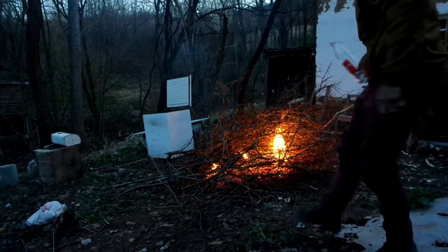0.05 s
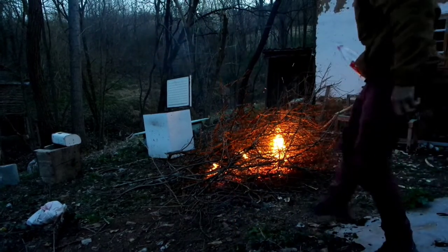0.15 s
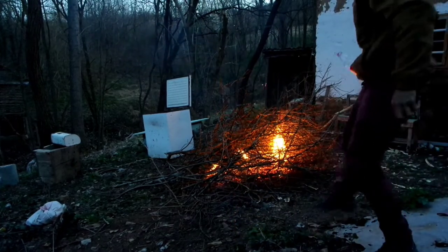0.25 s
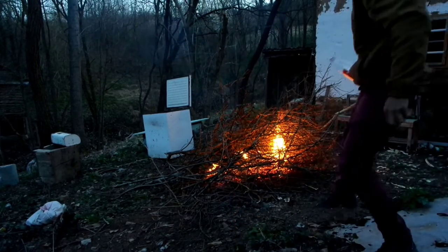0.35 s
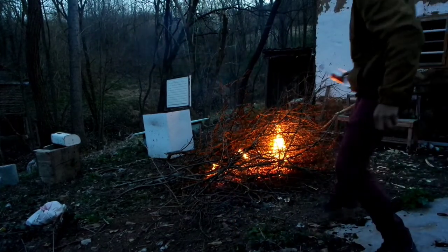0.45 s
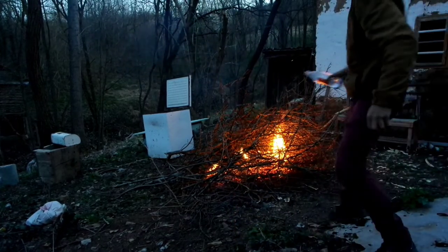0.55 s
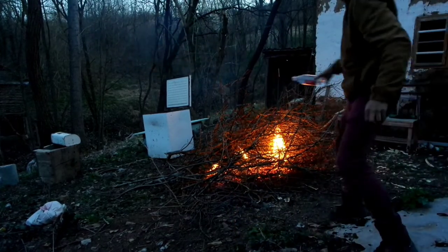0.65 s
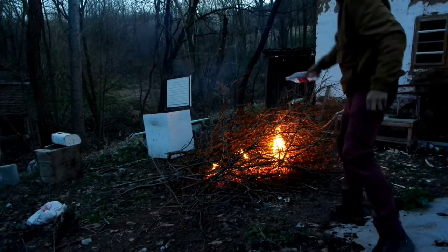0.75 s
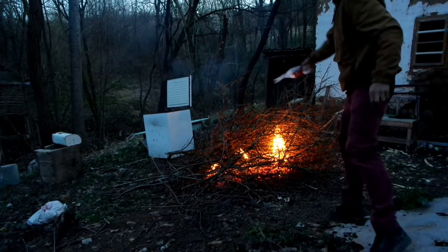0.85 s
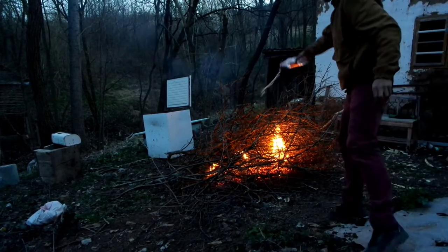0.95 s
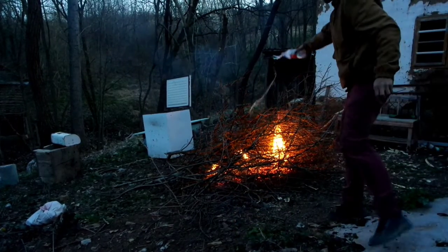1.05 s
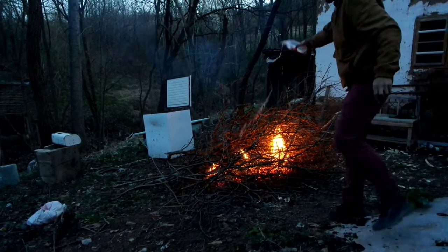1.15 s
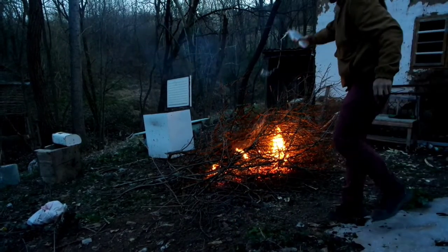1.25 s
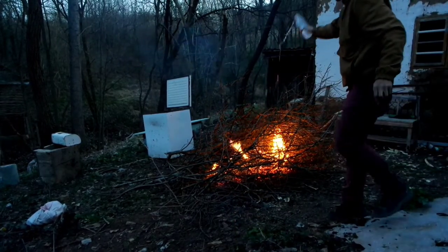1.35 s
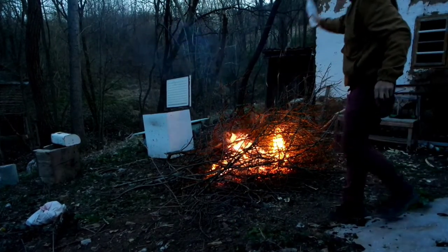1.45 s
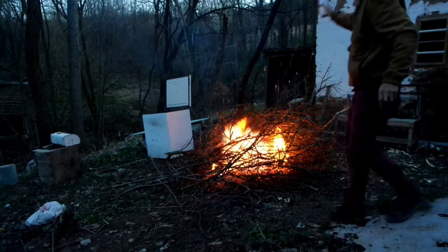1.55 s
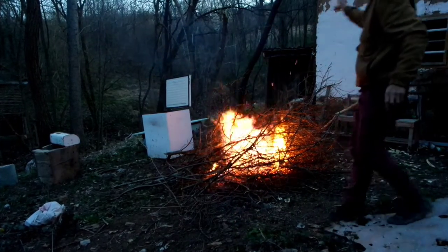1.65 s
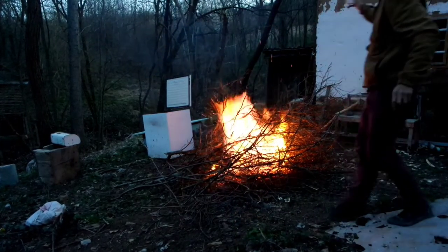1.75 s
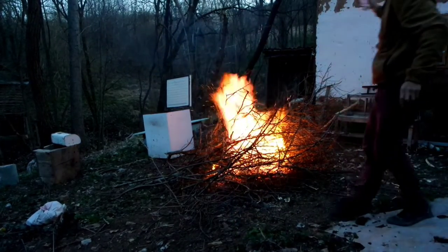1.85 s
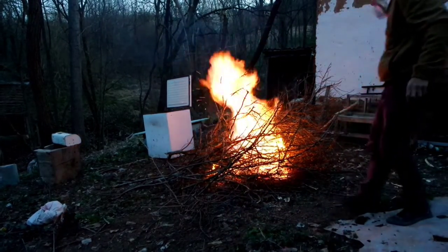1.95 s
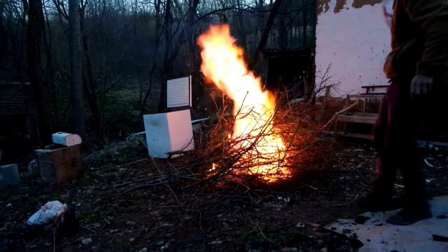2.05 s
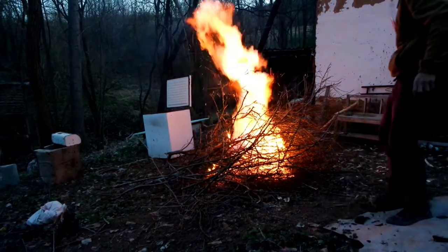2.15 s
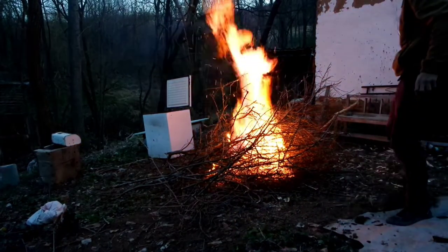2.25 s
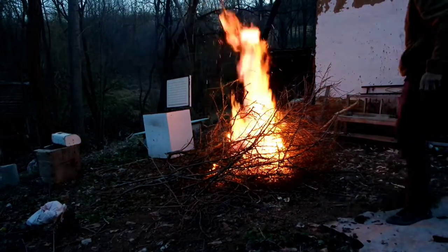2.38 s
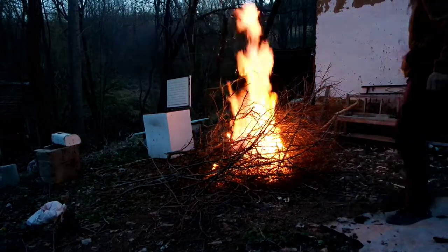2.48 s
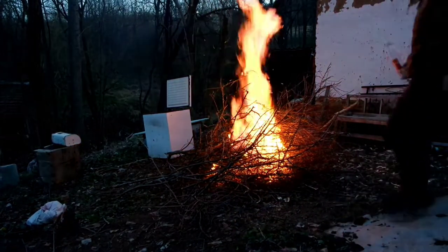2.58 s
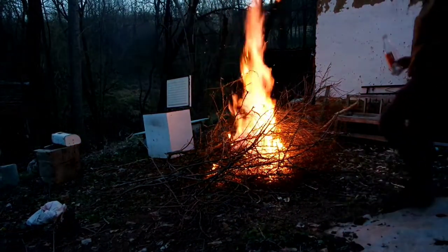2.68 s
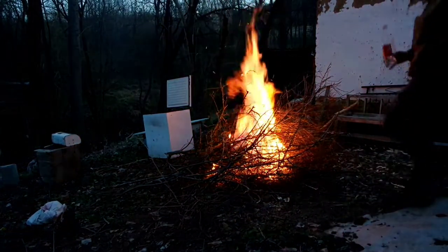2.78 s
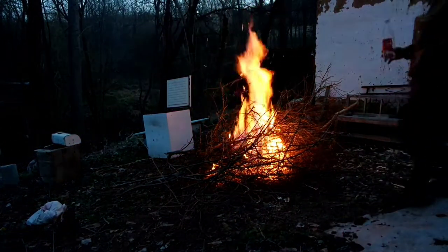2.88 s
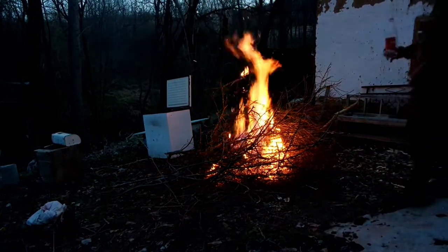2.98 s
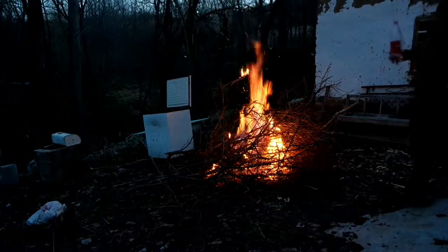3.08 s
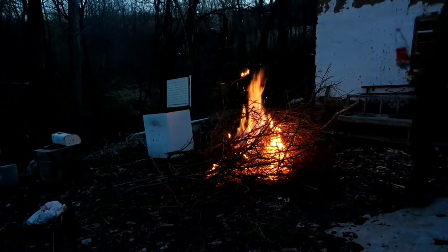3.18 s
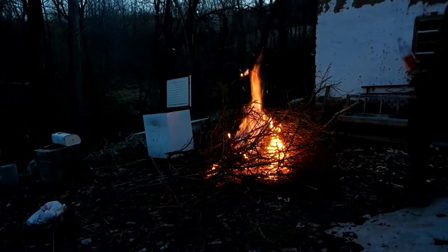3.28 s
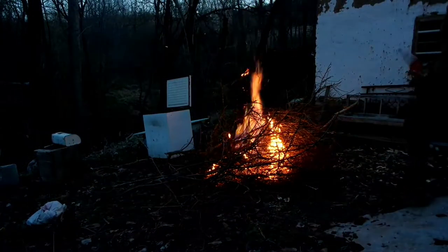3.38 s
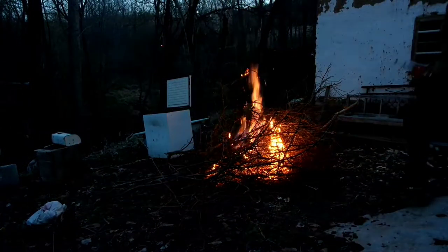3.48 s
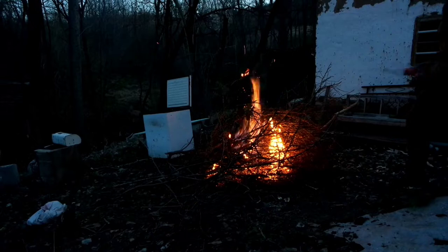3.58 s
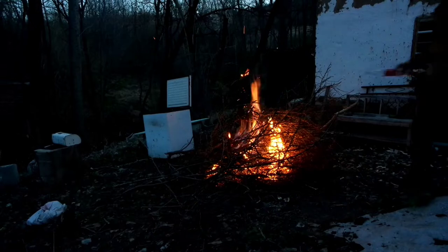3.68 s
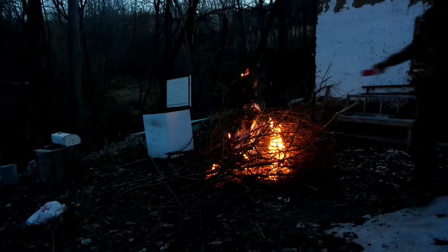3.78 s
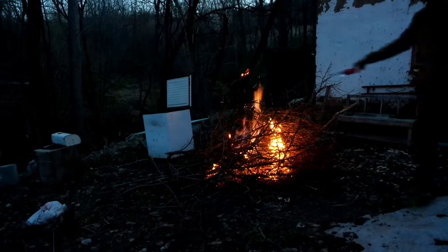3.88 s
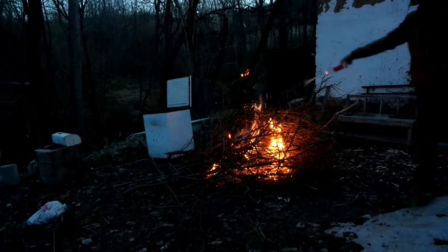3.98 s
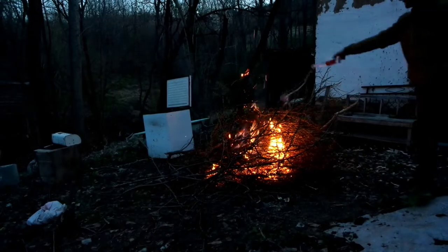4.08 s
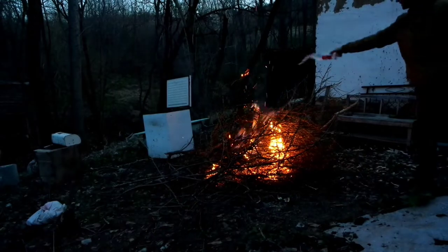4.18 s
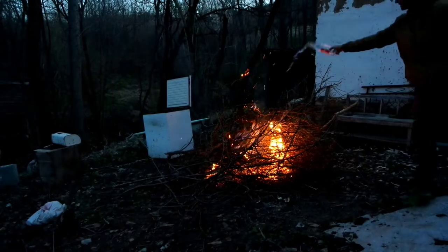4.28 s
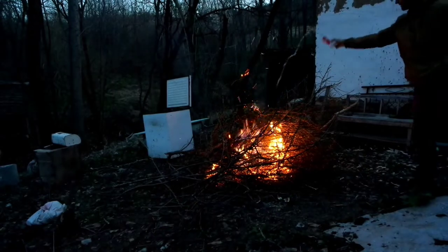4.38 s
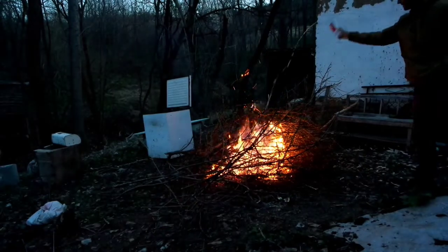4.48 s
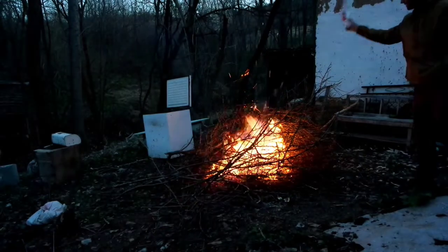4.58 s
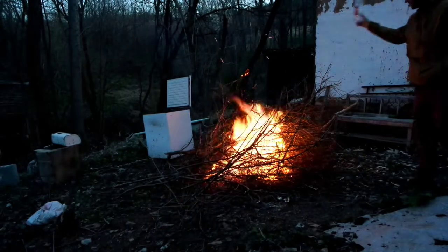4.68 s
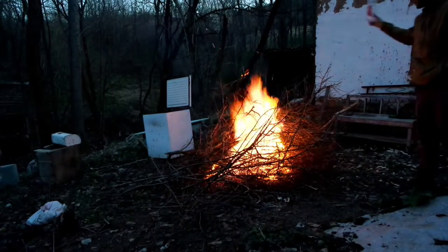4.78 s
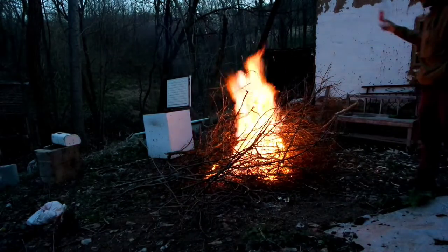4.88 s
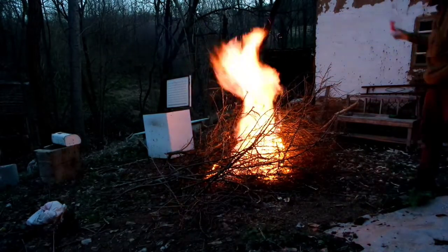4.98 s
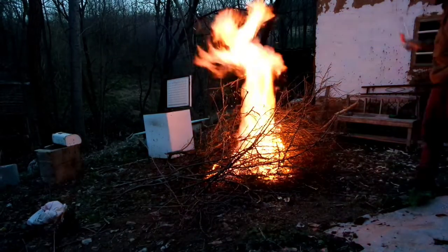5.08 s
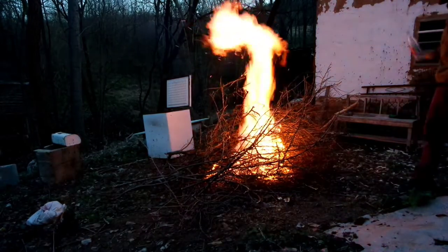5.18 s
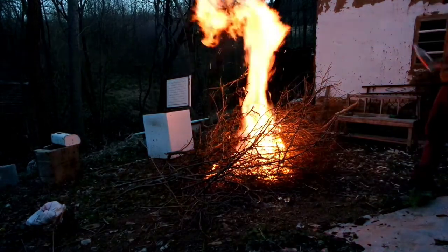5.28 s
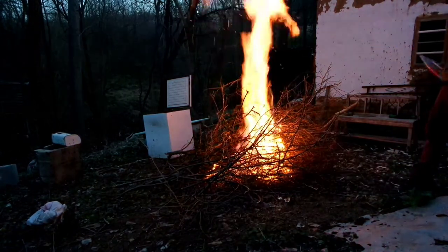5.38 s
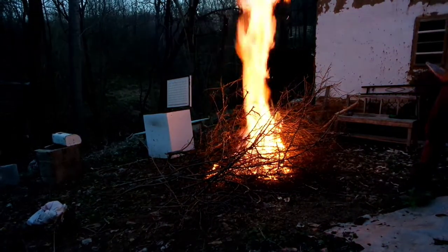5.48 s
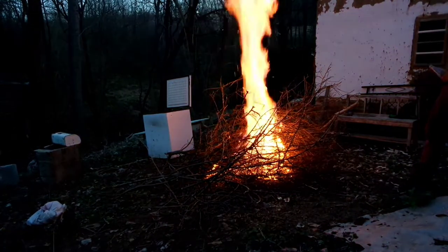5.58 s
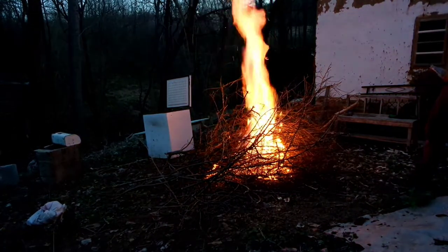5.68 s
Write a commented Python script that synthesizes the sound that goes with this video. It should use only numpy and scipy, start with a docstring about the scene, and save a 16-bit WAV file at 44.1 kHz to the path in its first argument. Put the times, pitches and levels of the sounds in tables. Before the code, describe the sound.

A brush pile burns in a garden at dusk. Nearly silent smouldering and bird trills give way to a spatter of fuel and a sudden deep, throbbing blaze with hissing steam and hard crackles. The fire dies back to small pops and a sharp spit, then rushes up again to the end. The microphone stands outdoors at moderate distance, fairly dry, with birds blurred by trees.

```python
"""A garden at dusk: a pile of wet brush smoulders, flares up, dies back and flares up again.
Flames are throbbing, fluttering noise; twigs sizzle as noise and pitched ticks, and sap bubbles ring.
Twigs snap in filtered pulses, gas pops in short swelling tones, and spits are jets of gritty noise.
Gliding tones make the birds and a thin steam whistle. Squirted fuel patters as small ringing drops,
and whoomps are low gusts of noise. The yard gives the crackle a short tail, the wood blurs the birds."""
import sys
import numpy as np
from scipy import signal
from scipy.fft import rfft, irfft
from scipy.io import wavfile
from scipy.ndimage import uniform_filter1d

SR = 44100
rng = np.random.default_rng(int(sys.argv[2]) if len(sys.argv) > 2 else 0)


def dump(signal):
    """Clip the signal to [-1, 1] and save it as 16-bit WAV at the path in sys.argv[1]."""
    limited = np.clip(np.atleast_2d(signal).T, -1, 1)
    pcm = np.round(limited * 32767).astype(np.int16)
    wavfile.write(sys.argv[1], SR, pcm)


N = 253134
TIME = np.arange(N) / SR  # seconds
HZ = np.fft.rfftfreq(N, 1 / SR)

# Tone curves of the still air, flame rumble, flame rush and sizzle.
# Each row: frequency in Hz, density in dB per Hz, relative within its curve.
AIR_CURVE = [(20, -20), (90, -11), (170, 5), (300, -5), (600, -16), (1500, -19.5), (6000, -20),
             (10500, -21.5), (15000, -21)]
RUMBLE_CURVE = [(8, -15), (22, -6), (40, -10.5), (85, -4), (115, -8), (175, -9), (210, -7), (320, -14),
                (450, -20), (800, -62), (2000, -94)]
RUSH_CURVE = [(80, -45), (250, -3.5), (520, 3), (800, -4), (1300, -8.5), (2300, -6.5), (3500, -12),
              (7000, -11.5), (16000, -75)]
SIZZLE_CURVE = [(300, -35), (1200, -24), (2400, -5.5), (4000, -2), (5500, -8.5), (8500, 2.5), (11500, 0.5),
                (13500, -2.5), (15000, -2.5)]
# Pitches at which the flame throbs. Each row: centre in Hz, width in Hz, boost over the rumble in dB.
FLAME_THROBS = [(60.8, 7.5, 7.5), (131.4, 12, 10.5), (151.6, 8.6, 12)]
# How hard the pile burns: embers, a flare that dies back, then a second.
# Each row: time in seconds, burn strength in dB, which drives the flame rumble.
BURN_CURVE = [(0, -52), (.16, -72), (.7, -72), (1.1, -63.5), (1.39, -66.5), (1.45, -56.5), (1.61, -56),
              (1.73, -38.5), (2.3, -38), (2.76, -39), (2.87, -43), (3.27, -39.5), (3.52, -45),
              (3.63, -51.5), (4.15, -53), (4.54, -54.5), (4.66, -40), (5.74, -38.5)]
# Spits of steam, gas and spattering liquid.
# Each row: start in seconds, level in dB, centre in Hz, rise in seconds, 60 dB fade in seconds.
SPIT_JETS = [(.003, -48.5, 7000, 0.0018, 0.32), (1.05, -51.5, 3540, 0.018, 0.28),
             (1.07, -62.5, 450, .03, .9), (1.2, -48.5, 3000, 0.0018, 0.084), (1.22, -57, 2980, .03, 0.39),
             (1.413, -41.5, 8200, 0.0047, 0.16), (1.43, -61, 1700, .02, 1.1),
             (1.452, -44.5, 7500, .002, 0.4), (1.5, -48, 7400, .14, 1.1), (1.74, -47, 3000, 0.15, 1.4),
             (2.47, -33, 9000, 0.037, 0.11), (2.674, -29.5, 6700, 0.011, 0.18),
             (2.944, -35, 5960, 0.0029, 0.14), (3.227, -40, 8000, .004, 0.52),
             (3.47, -39.5, 8500, .03, 0.33), (3.838, -45.5, 8100, 0.015, 0.14),
             (3.941, -30.5, 4750, 0.00079, 0.19), (3.945, -48.5, 590, 0.016, 0.43),
             (4.198, -38.5, 6600, 0.0012, 0.22), (4.28, -59, 5970, .03, 0.72), (4.63, -40, 7450, .02, .35),
             (4.98, -42.5, 2200, 0.059, 1.06), (5.43, -38, 9000, 0.0089, 0.26)]
# Placed twig snaps. Each row: start in seconds, strike energy in dB, centre in Hz,
# share of splintering from 0 to 1, number of cracks.
TWIG_SNAPS = [(0.0385, -22.5, 10900, 0.4, 1), (0.4374, -31.5, 9200, 0.5, 1), (0.889, -27.5, 4850, 0.46, 1),
              (1.0449, -27, 9020, 0.7, 1), (1.154, -24, 9100, 0, 1), (1.417, -13.5, 7760, 0.83, 1),
              (1.4539, -14.5, 7340, 0.2, 1), (1.82, -16.5, 6760, 0.8, 1), (1.9349, -16, 4400, 0.47, 1),
              (1.9746, -11, 3530, 0.77, 1), (2.0598, 0.5, 9600, 0.34, 1), (2.133, -12, 4080, 0.8, 1),
              (2.2866, -9, 7550, 0.7, 1), (2.5293, -9.5, 7400, 0.05, 1), (2.5717, -12.5, 4070, 0.4, 1),
              (2.946, -13, 5560, 0.5, 2), (3.0814, -1, 8800, 0.76, 1), (3.139, -14, 9200, 0.36, 1),
              (3.23, -12.5, 6380, 0.3, 1), (3.3122, -2.5, 10100, 0.46, 1), (3.6641, -20.5, 9000, 0.2, 1),
              (3.714, -19.5, 7000, 0.6, 1), (3.82, -23, 10220, 0.7, 1), (3.8415, -16.5, 8400, 0.25, 2),
              (3.921, -20, 9090, 0, 1), (3.9422, -9.5, 4900, 0.6, 1), (3.9528, -9.5, 7300, 0.3, 2),
              (4.0479, -24.5, 9000, 0.4, 1), (4.321, -28, 10000, 0.4, 1), (4.5544, -19, 9100, 0.8, 1),
              (4.635, -7.5, 8450, 0.18, 1), (4.8827, -1, 9200, 0.23, 1), (5.3104, -12, 9080, 0.4, 2),
              (5.3975, -12, 8500, 0.4, 1), (5.4688, -18, 8310, 0.2, 1), (5.5906, 2.5, 9800, 0.52, 2),
              (5.6947, -5.5, 9100, 0.4, 1)]
# Placed dull pops of gas and sap. Each row: time in seconds, strike energy in dB, centre in Hz.
GAS_POPS = [(0.5773, -38, 3240), (0.7773, -35.5, 617), (1.0884, -22.5, 3160), (1.099, -29, 1290),
            (1.204, -30.5, 1090), (1.4552, -21.5, 2640), (1.8656, -9, 2310), (1.9358, -14, 2310),
            (2.0203, -10, 800), (2.0209, 0.5, 202), (2.4987, -12, 2230), (2.5727, -14.5, 815),
            (2.7513, -11.5, 1910), (2.946, -13.5, 2450), (3.209, -18, 745), (3.266, -15, 800),
            (3.942, -16, 2060), (4.1754, -27, 2550), (4.1998, -22.5, 1280), (4.4517, -28, 3660),
            (4.9791, -13, 4820)]
# Chance crackles. Each set: rate per second, strike energy at full blaze in dB, spread in dB,
# lowest centre in Hz, highest centre in Hz.
CHANCE_SNAPS = (16, -20.5, 1, 5000, 10500)
CHANCE_POPS = (14, -24.5, 0.4, 604, 3000)
# Bird trills, one syllable repeated. Each row: start in seconds, repeats, period in seconds,
# swell in dB per repeat, syllable length in seconds, start, middle and end pitch in Hz,
# first syllable's level in dB ahead of the wood mix.
BIRD_TRILLS = [(0.122, 4, .16, 1.55, .08, 6430, 5710, 3630, -65.5),
               (1.438, 3, .2155, 1.8, 0.052, 4950, 5120, 5640, -48),
               (1.549, 2, 0.2, 5, 0.063, 4950, 4300, 3950, -56),
               (2.806, 4, 0.11, 0.7, 0.063, 3480, 3950, 4680, -49.5),
               (4.52, 4, .183, 1.9, 0.062, 4750, 5420, 5720, -54),
               (4.577, 4, 0.16, 1, 0.11, 6670, 6640, 6620, -52)]
# Single bird calls. Each row: start in seconds, length in seconds, start, middle and end pitch in Hz,
# level in dB ahead of the wood mix.
BIRD_CALLS = [(0.86, 0.14, 7980, 7370, 7000, -64), (1.084, 0.063, 5050, 4700, 3620, -54.5),
              (1.228, 0.066, 6350, 5950, 4270, -57), (1.333, 0.038, 4190, 4130, 4200, -59.5),
              (2.32, 0.11, 6750, 5820, 5820, -43.5), (2.507, 0.035, 4180, 3850, 3480, -47),
              (3.292, 0.098, 7450, 7280, 6960, -45), (3.45, 0.069, 5780, 5140, 3910, -47),
              (3.953, 0.16, 2380, 2300, 2134, -60), (4.27, .04, 4950, 4100, 3330, -54),
              (4.39, 0.093, 5970, 5970, 5890, -53.5), (4.987, 0.092, 2970, 2880, 2810, -47),
              (5.16, 0.09, 2155, 1995, 1870, -52), (5.256, 0.064, 4400, 4300, 4130, -47.5),
              (5.457, 0.13, 3000, 2680, 2096, -45), (5.574, .17, 2130, 2400, 2570, -45)]
# Steam singing thinly out of a wet branch. The row: start in seconds, length in seconds,
# start, middle and end pitch in Hz, level in dB.
STEAM_NOTE = (1, 0.5, 10677, 10304, 10446.5, -78)
# Squirted fuel pattering on the brush. The row: start in seconds, level in dB, rise in seconds,
# hold in seconds (below zero: the fade starts inside the rise), 60 dB fade in seconds.
FUEL_PATTER = (1.4, -60, 0.5, -0.16, 0.8)
# Splashes of fuel catching at once. Each row: start in seconds, level in dB, centre in Hz.
FUEL_WHOOMPS = [(1.69, -37, 68), (3.945, -43, 133), (4.195, -51, 160), (4.865, -36.5, 137)]

AIR_DB = -68.5
BLAZE_DB = -38  # burn strength at full blaze
# rush and sizzle follow the burn: drive at full blaze, and dB of change per dB of burn
RUSH_DB, RUSH_SLOPE = -47.3, 0.99
SIZZLE_DB, SIZZLE_SLOPE = -49.5, 1.0
EMBER_SIZZLE_DB = -78  # the sizzle drive never sinks below this
WARM_UP_S = 0.076  # time constant
RECRACK_S, RECRACK_DB = 0.0069, -3.5  # a tough twig gives way again, a little later and weaker
CRACKLE_SLOPE = 0.98  # dB of chance crackle energy per dB of burn
WHOOMP_RISE_S, WHOOMP_T60_S = 0.024, 0.43
CUTOFF_HZ = 15050


def amp(db):
    """Decibels to gain."""
    return 10 ** (np.asarray(db) / 20)


def unit(x):
    """Scales to an rms of 1."""
    return x / np.sqrt(np.mean(x ** 2) + 1e-20)


def unit_energy(x):
    """Scales to an energy of 1."""
    return x / (np.linalg.norm(x) + 1e-12)


def noise(length=N):
    """Raw white noise."""
    return rng.standard_normal(length)


def shape(points):
    """Gain at every frequency, from (Hz, dB) points on a log axis."""
    hz, db = np.transpose(points)
    return amp(np.interp(np.log(HZ + 1), np.log(hz + 1), db))


def colour(x, gain):
    """Filters x by a gain per frequency; rms 1."""
    return unit(irfft(rfft(x) * gain, N))


def wander(rate_hz):
    """Random drift of rms 1 that moves up to about rate_hz."""
    return colour(noise(), 1 / (1 + (HZ / rate_hz) ** 4))


def band(x, hz, spread):
    """Causal broad resonance from hz / spread to hz * spread, kept below the top of the range."""
    spread = max(spread, 1.05)
    top = min(hz * spread, 0.45 * SR)
    bottom = min(hz / spread, 0.75 * top)
    return signal.lfilter(*signal.butter(2, [bottom, top], "bandpass", fs=SR), x)


def add(mix, s, sound):
    """Mixes a sound in at s seconds."""
    part = mix[max(round(s * SR), 0):][:len(sound)]
    part += sound[:len(part)]


def swell(s, rise, hold, t60):
    """Gain that rises from s; its fade starts hold seconds after the rise."""
    t = TIME - s
    return np.clip(t / rise, 0, 1) * amp(-60 * np.maximum(t - rise - hold, 0) / t60)


def echoes(x, t60, delay):
    """Diffuse reflections that build up over delay seconds and die away."""
    t = TIME[:SR // 2]
    tail = noise(len(t)) * amp(-60 * t / t60) * (1 - np.exp(-t / delay))
    return signal.fftconvolve(x, unit_energy(tail))[:N]


def grains(per_s, spread_db, cap):
    """Sparse clicks of random sign, mostly small with a few large ones."""
    size = amp(spread_db * np.minimum(rng.exponential(1, N), cap))
    return size * rng.choice([-1, 1], N) * (rng.random(N) < per_s / SR)


def bubbles(per_s, spread_db):
    """Tiny drops and bubbles, each ringing for a few cycles at one of 22 pitches; rms 1."""
    out, t = np.zeros(N), TIME[:1200]
    for hz in np.geomspace(450, 4500, num=22):
        ring = np.sin(2 * np.pi * hz * t) * t * np.exp(-t * hz / 2.5)
        out += signal.oaconvolve(grains(per_s, spread_db, cap=3.1), unit_energy(ring))[:N]
    return unit(out)


def whistles(notes):
    """Near-pure tones that glide through three pitches and waver a little."""
    out, waver = np.zeros(N), wander(rate_hz=320)
    for s, length, start_hz, middle_hz, end_hz, db in notes:
        u = np.linspace(0, 1, int(length * SR))
        hz = np.polyval(np.polyfit([0, 0.5, 1], [start_hz, middle_hz, end_hz], 2), u)
        hz *= 1 + 0.0097 * np.roll(waver, -round(s * SR))[:len(u)]
        tone = np.sqrt(2) * np.sin(2 * np.pi * np.cumsum(hz) / SR)
        add(out, s, amp(db) * tone * signal.windows.tukey(len(u), 0.42))
    return out


def by_chance(burn_db, per_s, db, spread_db, low_hz, high_hz):
    """Rows (s, energy dB, centre Hz) of small crackles, stronger while the fire burns harder."""
    slot = np.arange(200)  # one crackle per slot, enough slots to outlast the scene
    when, size, pitch = rng.random((len(slot), 3)).T
    s = (slot + when) / per_s
    burn_change = CRACKLE_SLOPE * (np.interp(s, TIME, burn_db) - BLAZE_DB)
    level = db + burn_change + spread_db * (np.minimum(-np.log(size), 3) - 1)
    return np.transpose([s, level, low_hz * (high_hz / low_hz) ** pitch])


def warmed(burn_db):
    """Heat in the twigs: it lags behind a rising fire and sinks with a falling one."""
    keep, cold_db = np.exp(-1 / (WARM_UP_S * SR)), burn_db.min()
    lagging = cold_db + signal.lfilter([1 - keep], [1, -keep], burn_db - cold_db)
    return np.minimum(burn_db, lagging)


def evening_air():
    """Still air: a steady bed of quiet coloured noise."""
    return amp(AIR_DB) * colour(noise(), shape(AIR_CURVE))


def flames(burn_db, rush_db):
    """Turbulent burning: a throbbing rumble, and above it a fluttering rush full of tiny puffs."""
    throb = 1
    for hz, width, db in FLAME_THROBS:
        throb = throb + (amp(db) - 1) * np.exp(-2 * ((HZ - hz) / width) ** 2)
    rumble = colour(noise(), shape(RUMBLE_CURVE) * throb)
    # even out the slow level, so the burn sets the strength and single tongues of flame the flutter
    rumble /= np.sqrt(uniform_filter1d(rumble ** 2, size=8000) + 1e-6)
    flutter = wander(rate_hz=13)
    puffs = unit(grains(per_s=800, spread_db=2.5, cap=7.6))
    rush = colour(noise() + 0.69 * puffs, shape(RUSH_CURVE))
    return rumble * amp(burn_db + 0.66 + 1.3 * flutter) + rush * amp(rush_db + 1.5 * flutter)


def sizzle(burn_db):
    """Water boils out of hot twigs: a surging hiss, and fine ticks in eight pitch bands."""
    drive_db = SIZZLE_DB + SIZZLE_SLOPE * (warmed(burn_db) - BLAZE_DB)
    drive_db = np.maximum(drive_db, EMBER_SIZZLE_DB)
    hiss = ticks = 0
    surge = wander(rate_hz=27)
    for hz in np.geomspace(1800, 12500, num=8):
        # each jet of steam sputters by itself
        sputter = amp(1.3 * wander(rate_hz=100))
        hiss += unit(band(noise(), hz, spread=1.13)) * np.sqrt(hz) * sputter
        clicks = grains(per_s=120, spread_db=6.0, cap=3.25)
        ticks += unit(band(clicks, hz, spread=1.4)) * np.sqrt(hz)
    curve = shape(SIZZLE_CURVE)
    mix = amp(2.33) * colour(hiss, curve) + colour(ticks, curve)
    return mix * amp(drive_db + 2.0 * surge)


def boiling_sap(rush_db):
    """Sap bubbles ring, boiling harder as the flames grow."""
    return bubbles(per_s=14, spread_db=3.5) * amp(rush_db - 6.7)


def spits():
    """A quick jet of gritty noise that dies away, cut off at half a second."""
    out, t = np.zeros(N), TIME[:SR // 2]
    grit = noise() + 0.62 * unit(grains(per_s=1300, spread_db=4.0, cap=6.4))
    for s, db, hz, rise, t60 in SPIT_JETS:
        jet = unit(band(np.roll(grit, -round(s * SR))[:len(t)], hz, spread=3.0))
        fade_db = -60 * np.maximum(t - rise, 0) / t60
        add(out, s, jet * np.minimum(t / rise, 1) * amp(db + fade_db))
    return out


def snaps(burn_db):
    """A twig breaks in one sharp pulse; its fibres splinter for a few milliseconds more."""
    out, t = np.zeros(N), TIME[:900]
    pulse = signal.unit_impulse(len(t))
    strikes = [(*row, 0.4) for row in by_chance(burn_db, *CHANCE_SNAPS)]
    for s, db, hz, share, cracks in TWIG_SNAPS:
        for k in range(round(cracks)):
            strikes.append((s + k * RECRACK_S, db + k * RECRACK_DB, hz, share))
    for s, db, hz, share in strikes:
        share = np.clip(share, 0, 1)
        crack = unit_energy(band(pulse, hz, spread=1.31))
        crack += 0.56 * unit_energy(band(pulse, hz * 0.5, spread=1.92))  # the woody body
        splinter = unit_energy(band(noise(len(t)) * amp(-60 * t / 0.0097), hz, spread=1.8))
        add(out, s, amp(db) * (np.sqrt(1 - share) * crack + np.sqrt(share) * splinter))
    return out * amp(-0.04)


def pops(burn_db):
    """A pocket of gas bursts: a few cycles that swell and die, and a brief puff."""
    out, t = np.zeros(N), TIME[:2000]
    for s, db, hz in [*GAS_POPS, *by_chance(burn_db, *CHANCE_POPS)]:
        push = unit_energy(np.sin(2 * np.pi * hz * t) * t * np.exp(-t / (0.00027 + 0.25 / hz)))
        puff = unit_energy(band(noise(len(t)) * amp(-60 * t / 0.036), hz, spread=2.16))
        add(out, s - 0.0012, amp(db) * (0.68 * push + 0.65 * puff))  # early, to leave room for the swell
    return out


def birds():
    """Evenly paced trills that grow louder, and single calls, blurred by the wood."""
    notes = [*BIRD_CALLS]
    for s, repeats, period, swell_db, *glide, db in BIRD_TRILLS:
        for k in range(round(repeats)):
            notes.append((s + k * period, *glide, db + k * swell_db))
    song = whistles(notes)
    return amp(-4.0) * song + amp(-3.5) * echoes(song, t60=0.46, delay=0.0015)


def steam_whistle():
    """Steam escapes a wet branch as one thin, wavering high tone."""
    return whistles([STEAM_NOTE])


def fuel_patter():
    """Squirted fuel lands as a dense spatter of small ringing drops."""
    s, db, rise, hold, t60 = FUEL_PATTER
    return bubbles(per_s=45, spread_db=5.0) * amp(db) * swell(s, rise, hold, t60)


def whoomps():
    """A splash of fuel catches at once and pushes out a low gust."""
    out = np.zeros(N)
    for s, db, hz in FUEL_WHOOMPS:
        gust = unit(band(noise(), hz, spread=1.52))
        out += gust * amp(db) * swell(s, WHOOMP_RISE_S, 0, WHOOMP_T60_S)
    return out


def scene():
    """The fire in the yard, the squirt of fuel, the birds, and still evening air."""
    burn_db = np.interp(TIME, *np.transpose(BURN_CURVE))
    rush_db = RUSH_DB + RUSH_SLOPE * (burn_db - BLAZE_DB)
    fire = flames(burn_db, rush_db) + sizzle(burn_db) + boiling_sap(rush_db)
    fire += spits() + steam_whistle() + whoomps()
    crackle = snaps(burn_db) + pops(burn_db)
    yard = amp(-12.0) * echoes(crackle, t60=0.17, delay=0.0025)
    return (evening_air() + fire + crackle + yard + birds() + fuel_patter())[None]


def record(dry):
    """The recorder's band limit: a steep low-pass."""
    low_pass = signal.firwin(601, CUTOFF_HZ, window=("kaiser", 8), fs=SR)
    return signal.oaconvolve(dry, low_pass[None], "same")


dry = scene()
out = record(dry)
dump(out)
```